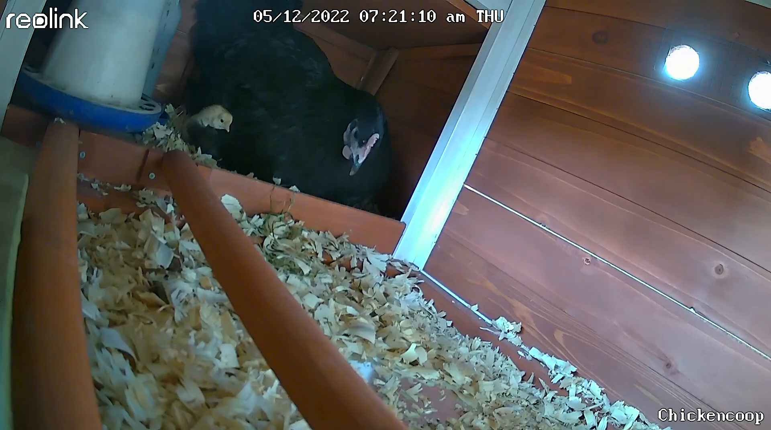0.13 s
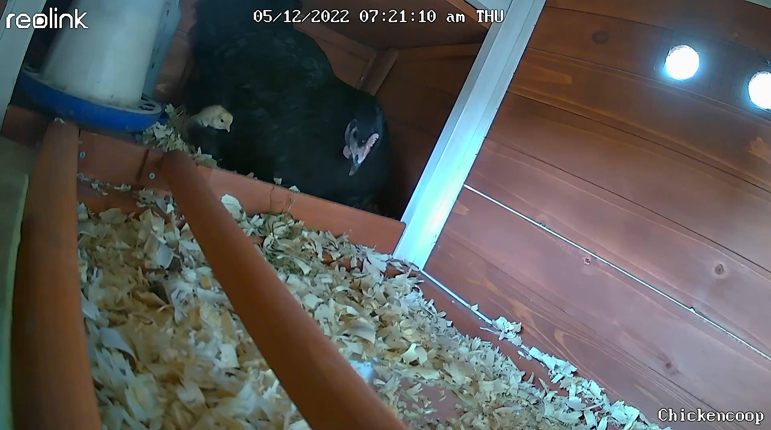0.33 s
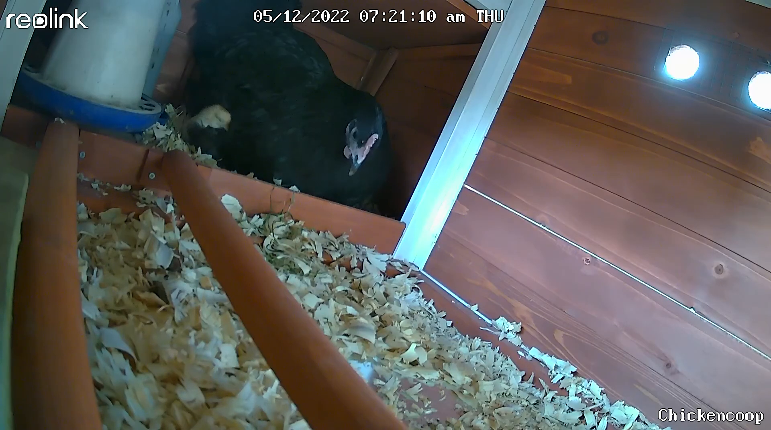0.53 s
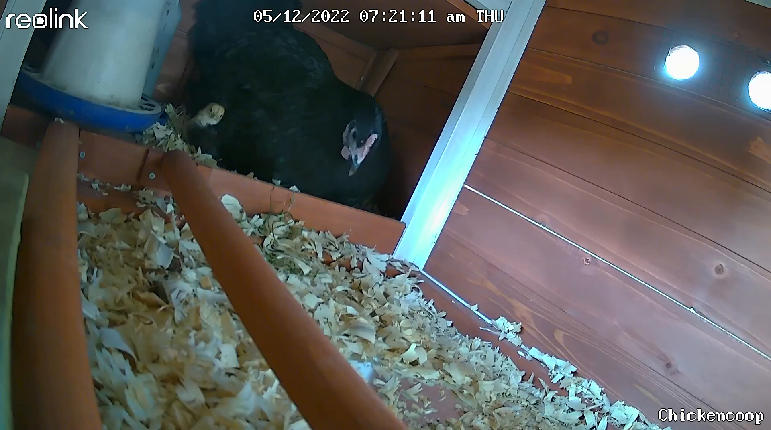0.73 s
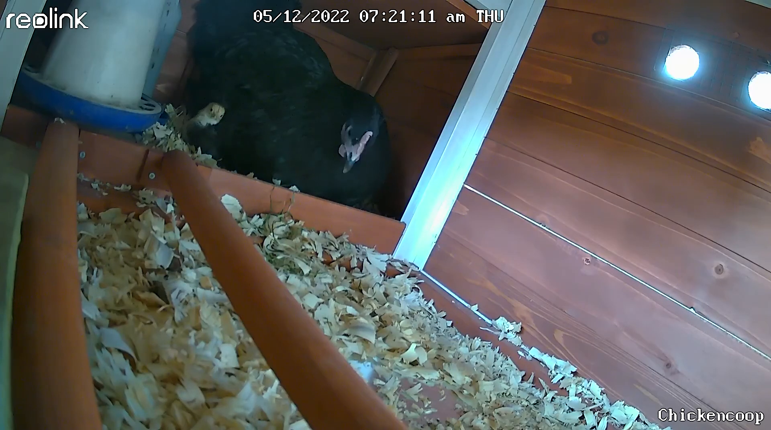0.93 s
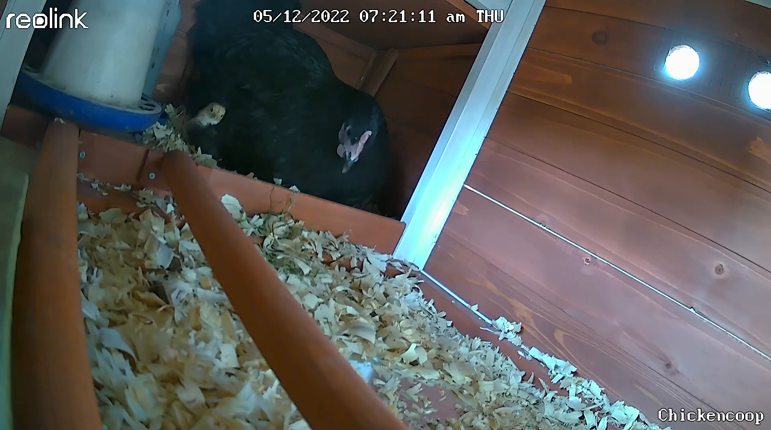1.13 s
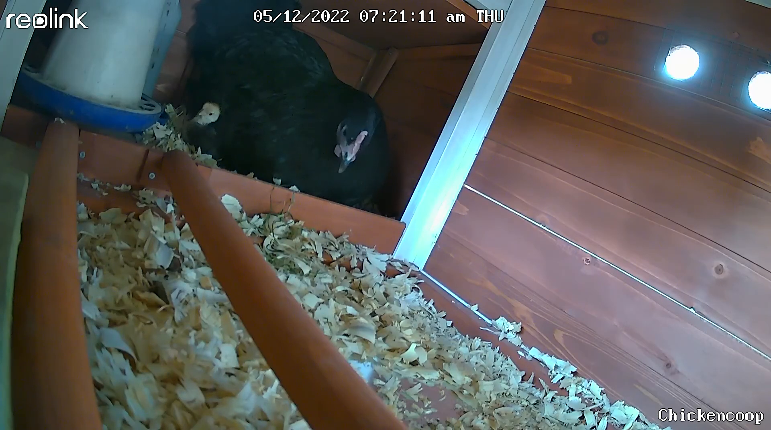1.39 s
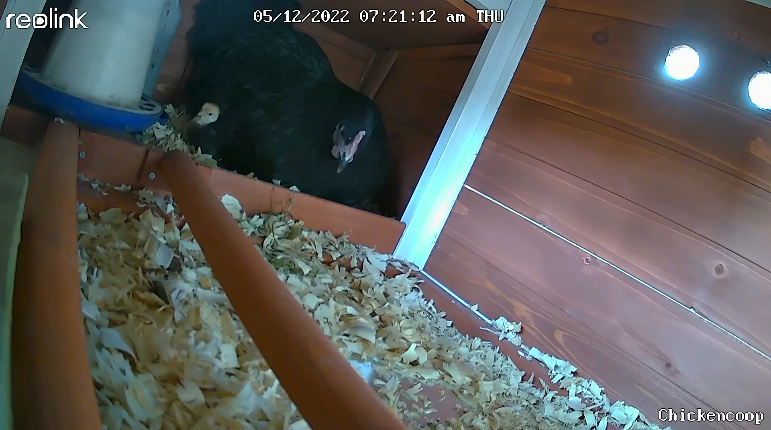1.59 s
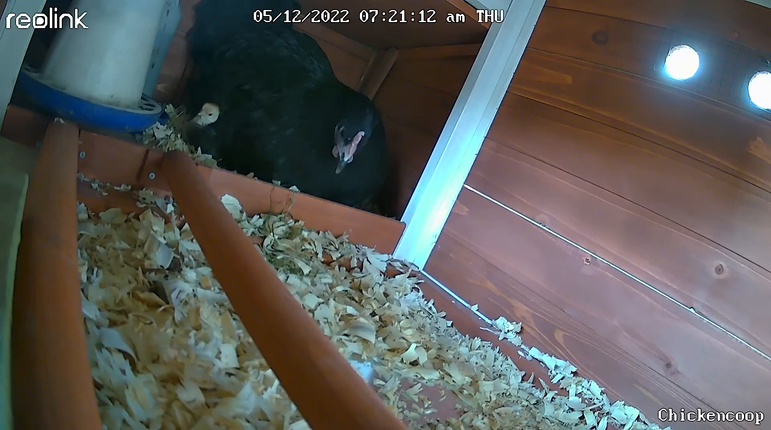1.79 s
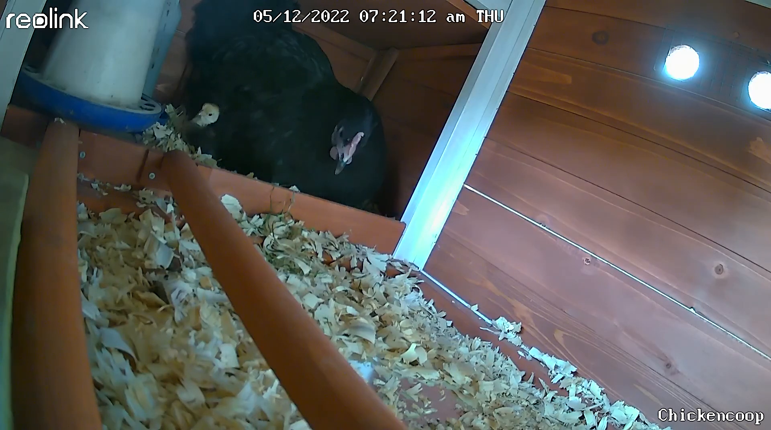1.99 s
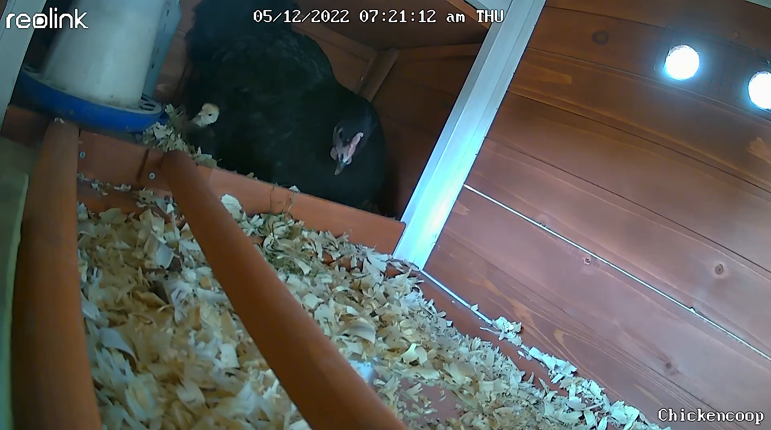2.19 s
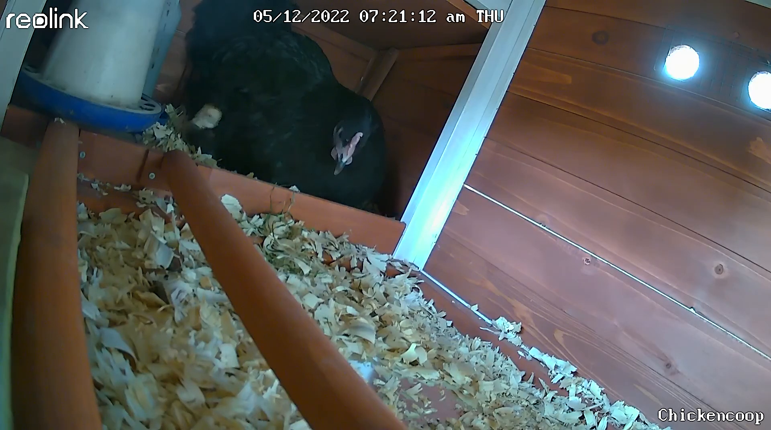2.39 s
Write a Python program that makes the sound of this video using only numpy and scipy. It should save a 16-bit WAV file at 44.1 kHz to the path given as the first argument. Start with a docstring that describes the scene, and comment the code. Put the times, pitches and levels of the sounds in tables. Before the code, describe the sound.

A broody hen gives low, short clucks in a wooden coop while a chick peeps thinly

```python
"""A low rumble runs throughout, under a faint airy noise that slowly eases.
A broody hen opens with a double cluck in her small wooden coop; soft bumps on the boards follow now and then.
Faint high whistles glide by, a far bird repeats a falling phrase, and a chick beside the hen starts to peep.
Single clucks follow, each a gliding tone ringing in the box, while a wash of distant birds comes and goes.
Late on there is one dry click, then the last peeps, and a softer double cluck with a bump ends the scene."""
import sys
import numpy as np
from scipy import signal
from scipy.fft import rfft, irfft
from scipy.io import wavfile

SR = 44100
rng = np.random.default_rng(int(sys.argv[2]) if len(sys.argv) > 2 else 0)


def dump(signal):
    """Clip the signal to [-1, 1] and save it as 16-bit WAV at the path in sys.argv[1]."""
    limited = np.clip(np.atleast_2d(signal).T, -1, 1)
    pcm = np.round(limited * 32767).astype(np.int16)
    wavfile.write(sys.argv[1], SR, pcm)


N = 112455  # length in samples
TIME = np.arange(N) / SR  # seconds

# Colour of the low rumble: pitch_hz, relative_level_db_per_hz
RUMBLE_COLOUR = [(20, -17.5), (35, 5), (55, -1.5), (70, -2.5), (90, -11.5), (125, -14.5), (160, -26.5),
                 (230, -32.5), (400, -62.5)]
# Colour of the faint airy noise: pitch_hz, relative_level_db_per_hz
AIR_COLOUR = [(250, -5), (325, 13.5), (385, -2), (450, 8), (560, 0.5), (800, -4.5), (935, 6), (1060, 0),
              (1700, -6.5), (2300, -18), (2900, -37), (5400, -58)]
RUMBLE_DB = -27.5
AIR_MIDDLE_DB, AIR_SLOPE_DB_PER_S = -52.5, -1.9  # level halfway through, and how it eases

# Loudness of the high wash of distant birds over time: time_s, level_db
WASH_LEVELS = [(.16, -100), (.45, -73), (.83, -88), (1.08, -67.5), (1.16, -99), (1.5, -64), (1.7, -70.5),
               (1.87, -59), (1.95, -65), (2.17, -62), (2.35, -80)]
# Colour of that wash: pitch_hz, relative_level_db_per_hz
WASH_COLOUR = [(1600, -19.5), (2250, 1), (2700, 8.5), (3300, 6), (3750, 4.5), (4050, -8), (4450, -4),
               (4900, -36), (5600, -55.5)]
WASH_FLICKER_DB = 1.2

# Faint high whistles, short and gliding, some just after the peeps and clucks:
# start_s, length_s, start_pitch_hz, end_pitch_hz, level_db
FAINT_WHISTLES = [(0.311, 0.093, 3494, 3820, -63.5), (0.551, 0.026, 4230, 4350, -62.5),
                  (0.541, 0.14, 5500, 5370, -65), (0.745, 0.115, 4800, 4110, -56.5),
                  (0.778, 0.037, 3700, 3620, -54), (0.912, 0.15, 4540, 4712, -60),
                  (1.249, 0.12, 3748, 3704, -55), (1.445, 0.038, 4790, 4370, -58),
                  (1.605, 0.023, 3320, 3220, -52.5), (1.66, 0.1, 4350, 4660, -61),
                  (1.775, 0.06, 3820, 3530, -53), (1.827, 0.034, 4370, 4450, -57),
                  (1.949, 0.052, 4283, 4300, -60.5), (2.056, 0.06, 4170, 4236, -62),
                  (2.369, 0.062, 5400, 5196, -66), (2.522, 0.081, 3920, 3690, -47.5)]
# Each time a far bird repeats its falling phrase: start_s, level_db
PHRASE_REPEATS = [(0.385, -60.5), (0.886, -52.5), (1.386, -51), (1.886, -50.5)]
# Notes of that phrase: start_in_phrase_s, length_s, start_pitch_hz, end_pitch_hz, level_in_phrase_db
PHRASE_NOTES = [(0, .028, 2016, 2090, -0.5), (.02, 0.087, 2298, 2230, -2.5), (.075, .065, 2067, 2010, -5.5),
                (.135, .09, 1932, 1800, -3.5), (.22, .05, 1675, 1620, -4.5)]
WHISTLE_JITTER, PHRASE_JITTER = 0.015, 0.014  # spread, as a share of the pitch
SOFT_EDGE = .48  # these faint notes swell and fade over nearly their whole length
BLUR_T60_S, BLUR_DB = 0.29, -2  # the diffuse tail that blurs them

# Soft bumps on the boards: start_s, level_db, hardness_db (added to the upper board tone only)
BUMPS = [(0.218, -32, -1), (0.554, -26, -13), (.622, -31, -6), (0.864, -28.5, -9.5), (2.528, -29, 6)]
# Tones of the boards, lower then upper: pitch_hz, level_db, time_to_fall_60_db_s
BOARD_TONES = [(198, 5, 0.099), (321, 8, 0.049)]
# Short dying tones within the click: pitch_hz, level_db, time_to_fall_60_db_s
CLICK_TONES = [(435, -32, 0.071), (750, -31, 0.0075)]
CLICK_S, CLICK_IMPULSE_DB, CLICK_LOWPASS_HZ = 2.021, -27.5, 796

# The chick's peeps, some in joined parts: start_s, length_s, start_pitch_hz, turning_pitch_hz,
# end_pitch_hz, pitch_roughness_share, level_db, octave_relative_db (before the octave's narrow band)
PEEPS = [(.486, .06, 3220, 3420, 3480, .004, -39.5, -30), (.675, .034, 3550, 3580, 3720, .005, -43.5, -12),
         (.701, .032, 3950, 3620, 3200, .02, -42, -13), (1.064, .024, 2050, 2550, 3150, .06, -48.5, -18),
         (1.084, .042, 3500, 3620, 3600, .04, -56.5, -40), (1.742, .055, 2950, 3450, 4000, .05, -48, -45),
         (2.002, .021, 3400, 3300, 3200, .012, -44.5, -45),
         (2.221, .036, 3960, 3850, 3640, .003, -40.5, -28), (2.251, .011, 3680, 3600, 3530, .004, -30, -45),
         (2.261, .016, 3550, 3300, 3050, .018, -40, -45)]
PEEP_EDGE = 0.36  # rounded share of each end
# The peeps' faint octave is kept to a narrow band near this pitch
OCTAVE_BAND_HZ, OCTAVE_BAND_T60_S = 6780, 0.011
WALL_ECHO_S = 0.0036  # the peeps come back from the walls this much later
COOP_T60_S, COOP_HEN_DB, COOP_CHICK_DB = 0.12, -19.5, -10.5

# The hen's notes, the first and last clucks double: start_s, swell_s, fade_s,
# start_pitch_hz, peak_pitch_hz, end_pitch_hz, level_db (before the box adds its ringing)
CLUCKS = [(.109, 0.0078, .012, 611, 596.4, 630, -15), (0.122, 0.016, 0.0067, 706, 522, 493, -15.5),
          (0.672, 0.027, .009, 571, 543.6, 510, -12.5), (1.079, 0.025, .008, 593, 544, 493, -12),
          (1.544, 0.028, 0.00796, 587, 533, 491, -12.5), (2.499, 0.017, 0.028, 564, 514.7, 363, -18),
          (2.532, 0.0061, 0.0069, 782, 585, 429, -21)]
# Resonances of the wooden box: pitch_hz, level_db, time_to_fall_60_db_s
BOX_RESONANCES = [(206, -10, 0.13), (312, 2.5, 0.086), (412, -5, 0.26), (697, -14.5, 0.09),
                  (950, -37.5, 0.076)]
# Colour of the rasp in the hen's notes: pitch_hz, relative_level_db_per_hz
RASP_COLOUR = [(300, -10.5), (900, -2.5), (1500, -11), (3300, -14), (4300, -25), (6000, -26), (9000, -65)]
RASP_DB = -53.5  # relative to the note
CLUCK_JITTER = .008  # spread, as a share of the pitch
SWELL_SHAPE = 0.9  # power of the rise; 1 would be a straight line
# The octave speaks as it falls into a throat resonance
OCTAVE_DB, THROAT_HZ, THROAT_T60_S = -18, 973, 0.056
# The throat rings lower as it closes, starting just before the note ends
CLOSE_DB, CLOSE_LEAD_S, CLOSE_T60_S, CLOSE_HZ = -4.5, 0.0012, 0.041, 465

CUTOFF_HZ = 16000  # from here up, at least 60 dB down


def from_db(db):
    """Decibels to gain."""
    return 10 ** (np.asarray(db) / 20)


def rms_one(x):
    """Scale to an average (rms) level of 1."""
    return x / np.sqrt(np.mean(x ** 2) + 1e-20)


def drift(rate_hz):
    """Random wandering of spread 1: noise smoothed so that little is left well above the given rate."""
    r = np.exp(-2 * np.pi * rate_hz / SR)
    wander = signal.lfilter([1], [1, -2 * r, r * r], rng.standard_normal(2 * N))
    return rms_one(wander[N:])  # drop the filter's start-up


def noise(colour):
    """Steady noise of a given colour, rms 1: white noise reshaped frequency by frequency."""
    hz, db = np.transpose(colour)
    grid = np.maximum(np.arange(N // 2 + 1) * SR / N, 1)
    gain = from_db(np.interp(np.log(grid), np.log(hz), db))
    return rms_one(irfft(rfft(rng.standard_normal(N)) * gain, N))


def resonance(x, hz, t60):
    """A band-pass of peak gain 1 whose ringing falls 60 dB in t60 seconds."""
    r = np.exp(-np.log(1000) / (t60 * SR))
    feed = np.array([1, 0, -1]) * (1 - r * r) / 2
    feedback = [1, -2 * r * np.cos(2 * np.pi * hz / SR), r * r]
    return signal.lfilter(feed, feedback, x + 1e-18)


def ring(start, hz, t60, attack_s):
    """A dying sine with a soft start."""
    t = np.maximum(TIME - start, 0)
    decay = np.exp(-np.log(1000) * t / t60)
    attack = 1 - np.exp(-t / attack_s)
    return np.sin(2 * np.pi * hz * t) * decay * attack


def reverb(x, t60, delay_s=0):
    """A diffuse tail of unit energy, made of dying noise that sets in after a delay."""
    t = TIME[:SR // 2]
    tail = rng.standard_normal(len(t)) * np.exp(-np.log(1000) * t / t60) * (t >= delay_s)
    return signal.fftconvolve(x, tail / np.linalg.norm(tail))[:N]


def whistle(start, length, pitches, waver, edge, harmonic=1):
    """A sine that glides through its pitches at equal time steps, with rounded ends."""
    u = np.clip((TIME - start) / length, 0, 1)  # share of the note already past
    pitch = np.interp(u, np.linspace(0, 1, len(pitches)), pitches) * (1 + waver)
    envelope = np.sin(np.pi / 2 * np.clip(np.minimum(u, 1 - u) / edge, 0, 1))
    return envelope * np.sin(2 * np.pi * harmonic * np.cumsum(pitch) / SR)


def low_rumble():
    """Steady low noise, strongest around 35 Hz."""
    return from_db(RUMBLE_DB) * noise(RUMBLE_COLOUR + [(1500, -110)])  # fades out towards 1500 Hz


def airy_noise():
    """Faint coloured noise that slowly gets quieter."""
    level_db = AIR_MIDDLE_DB + AIR_SLOPE_DB_PER_S * (TIME - TIME.mean())
    return from_db(level_db) * noise(AIR_COLOUR)


def distant_wash():
    """Distant birds blended into high noise that comes and goes with a slight flicker."""
    level_db = np.interp(TIME, *np.transpose(WASH_LEVELS)) + WASH_FLICKER_DB * drift(26)
    return from_db(level_db) * noise(WASH_COLOUR)


def faint_whistles():
    """Faint, thin, high whistles: short gliding sines with a wavering pitch and a diffuse tail."""
    waver = WHISTLE_JITTER * drift(300)
    whistles = np.zeros(N)
    for start, length, first_hz, end_hz, db in FAINT_WHISTLES:
        whistles += from_db(db) * whistle(start, length, [first_hz, end_hz], waver, SOFT_EDGE)
    return whistles + from_db(BLUR_DB) * reverb(whistles, BLUR_T60_S)


def far_bird():
    """A bird repeats a falling phrase of gliding sines, blurred by distance."""
    waver = PHRASE_JITTER * drift(100)
    song = np.zeros(N)
    for phrase_start, phrase_db in PHRASE_REPEATS:
        for offset, length, first_hz, end_hz, db in PHRASE_NOTES:
            note = whistle(phrase_start + offset, length, [first_hz, end_hz], waver, SOFT_EDGE)
            song += from_db(phrase_db + db) * note
    return song + from_db(BLUR_DB) * reverb(song, BLUR_T60_S)


def dry_click():
    """One impulse softened by a low-pass, with short dying tones."""
    impulse = from_db(CLICK_IMPULSE_DB) * (np.arange(N) == int(CLICK_S * SR))
    smoothing = np.exp(-2 * np.pi * CLICK_LOWPASS_HZ / SR)
    click = signal.lfilter([1], [1, -smoothing], impulse + 1e-18)
    for hz, db, t60 in CLICK_TONES:
        click += from_db(db) * ring(CLICK_S, hz, t60, attack_s=1 / SR)
    return click


def board_bumps():
    """Dull bumps: each sets off two dying board tones, the upper one made louder or softer by hardness."""
    bumps = np.zeros(N)
    lower, upper = BOARD_TONES
    for start, db, hardness_db in BUMPS:
        for (hz, tone_db, t60), extra_db in ((lower, 0), (upper, hardness_db)):
            bumps += from_db(db + tone_db + extra_db) * ring(start, hz, t60, attack_s=0.0073)
    return bumps


def chick():
    """Thin gliding peeps, some clear and some roughened in pitch, echoed by the walls."""
    waver, tone, octave = drift(310), np.zeros(N), np.zeros(N)
    for start, length, first_hz, turn_hz, end_hz, rough, db, octave_db in PEEPS:
        pitches = [first_hz, turn_hz, end_hz]
        tone += from_db(db) * whistle(start, length, pitches, rough * waver, PEEP_EDGE)
        # slightly under a true octave
        upper = whistle(start, length, pitches, rough * waver, PEEP_EDGE, harmonic=1.98)
        octave += from_db(db + octave_db) * upper
    peeps = tone + resonance(octave, OCTAVE_BAND_HZ, OCTAVE_BAND_T60_S)
    return peeps + from_db(COOP_CHICK_DB) * reverb(peeps, COOP_T60_S, WALL_ECHO_S)


def hen():
    """Notes swell and sag, glide in pitch as they are cut off, and end in a brief ring inside the box."""
    notes = np.zeros(N)
    waver = 1 + CLUCK_JITTER * drift(180)
    rasp = from_db(RASP_DB) * noise(RASP_COLOUR)
    for start, swell, fade, first_hz, peak_hz, end_hz, db in CLUCKS:
        t = np.maximum(TIME - start, 0)
        pitch = np.interp(t, [0, swell, swell + fade], [first_hz, peak_hz, end_hz])
        phase = 2 * np.pi * np.cumsum(pitch * waver * (t > 0)) / SR
        rise = np.minimum(t / swell, 1) ** SWELL_SHAPE
        fall = np.cos(np.pi / 2 * np.clip((t - swell) / fade, 0, 1)) ** 2
        envelope = rise * fall
        voice = envelope * (np.sin(phase) + rasp)
        octave = from_db(OCTAVE_DB) * resonance(envelope * np.sin(2 * phase), THROAT_HZ, THROAT_T60_S)
        close_start = start + swell + fade - CLOSE_LEAD_S
        closing = from_db(CLOSE_DB) * ring(close_start, CLOSE_HZ, CLOSE_T60_S, attack_s=0.002)
        notes += from_db(db) * (voice + octave + closing)
    boxed = notes + sum(from_db(db) * resonance(notes, hz, t60) for hz, db, t60 in BOX_RESONANCES)
    return boxed + from_db(COOP_HEN_DB) * reverb(boxed, COOP_T60_S)


def scene():
    """Add all layers into one channel, from the background to the hen."""
    background = low_rumble() + airy_noise() + distant_wash() + faint_whistles() + far_bird()
    coop = board_bumps() + chick() + hen()
    return (background + dry_click() + coop)[None]


def record(dry):
    """A steep low-pass cuts the very top."""
    lowpass = signal.cheby2(12, 60, CUTOFF_HZ, fs=SR, output="sos")
    return signal.sosfilt(lowpass, dry)


dry = scene()
out = record(dry)
dump(out)
```